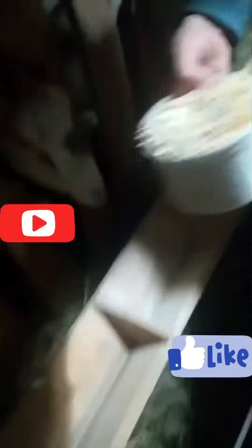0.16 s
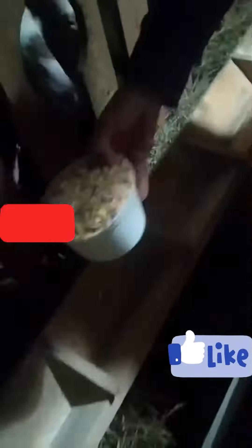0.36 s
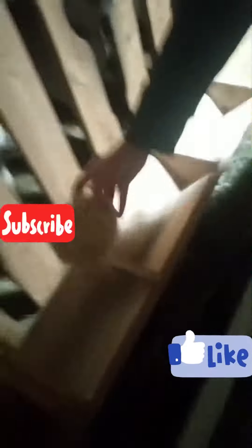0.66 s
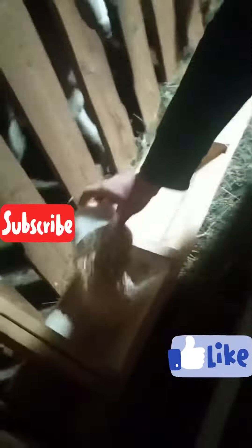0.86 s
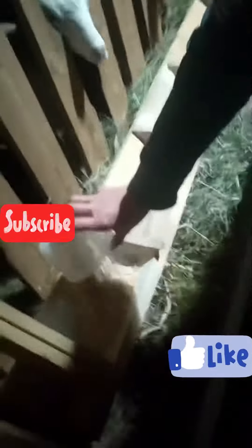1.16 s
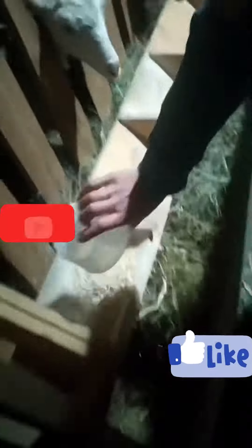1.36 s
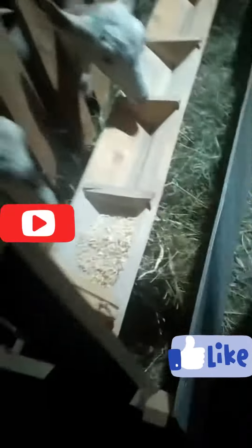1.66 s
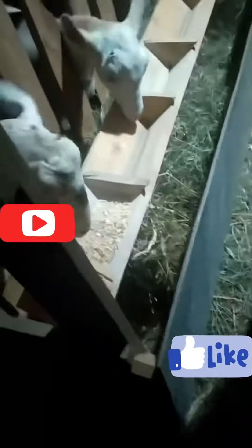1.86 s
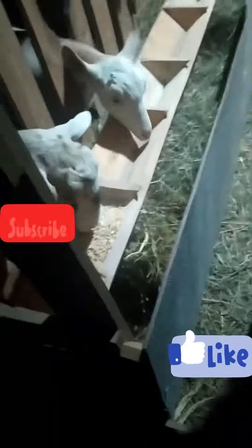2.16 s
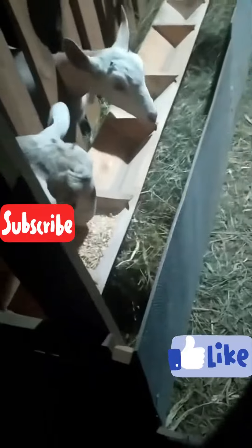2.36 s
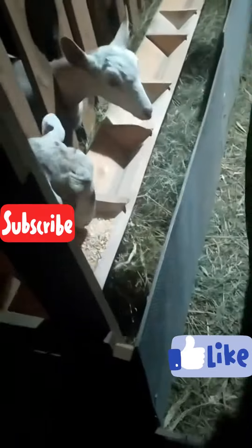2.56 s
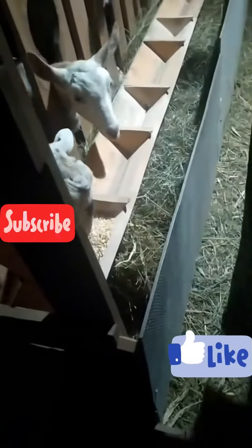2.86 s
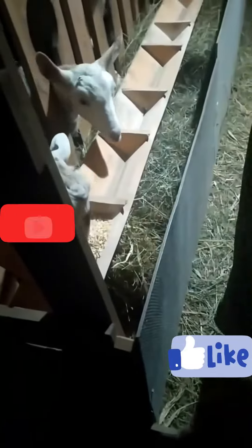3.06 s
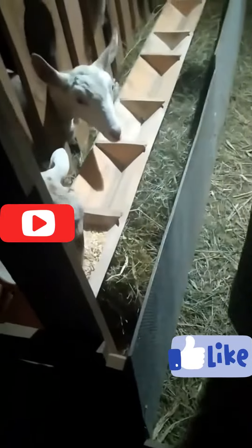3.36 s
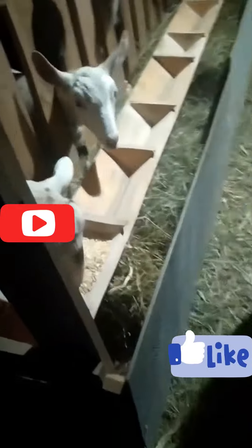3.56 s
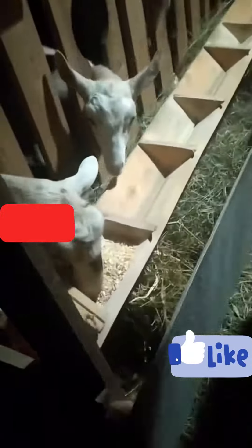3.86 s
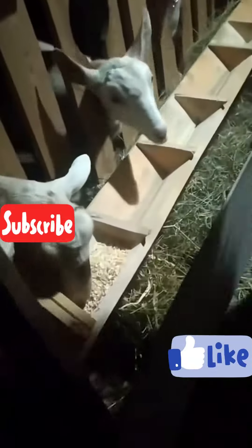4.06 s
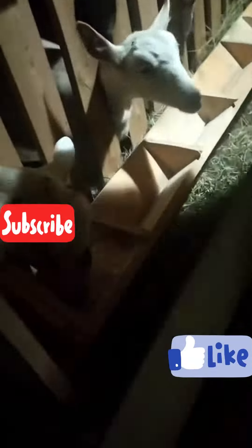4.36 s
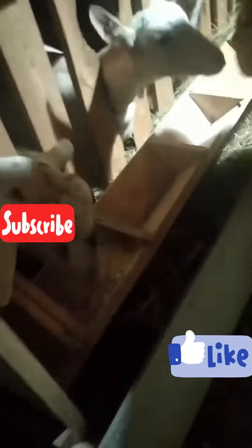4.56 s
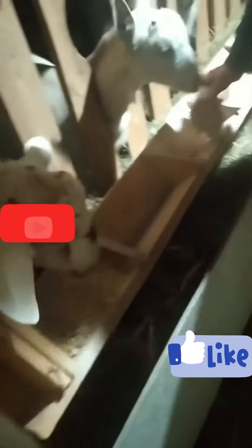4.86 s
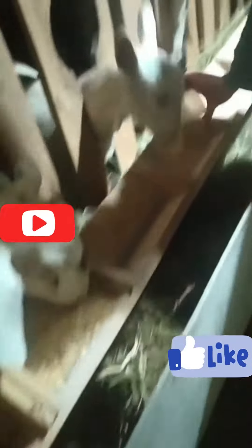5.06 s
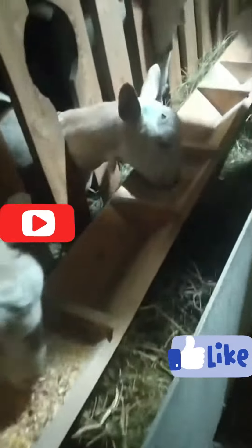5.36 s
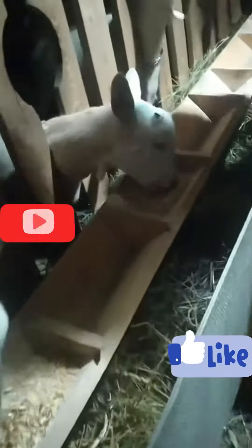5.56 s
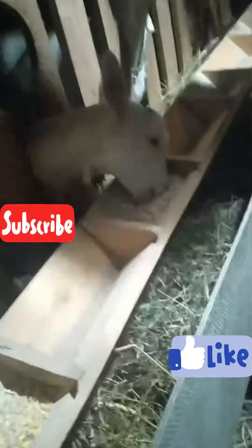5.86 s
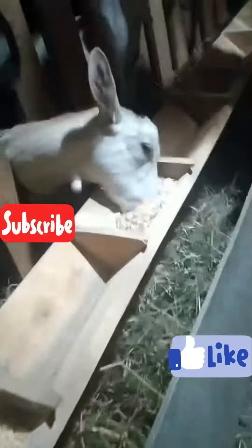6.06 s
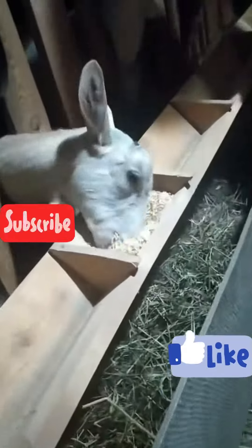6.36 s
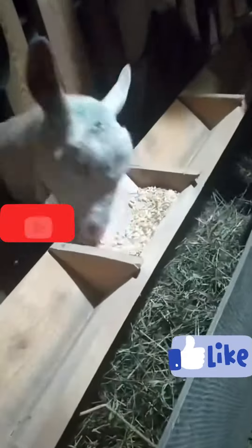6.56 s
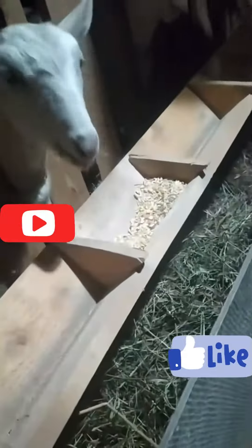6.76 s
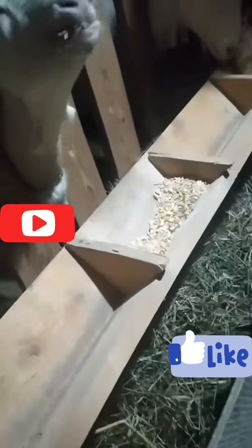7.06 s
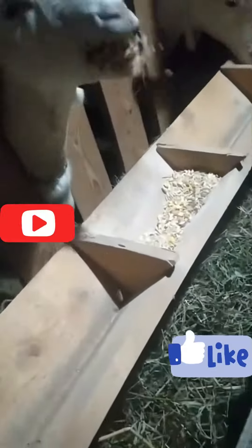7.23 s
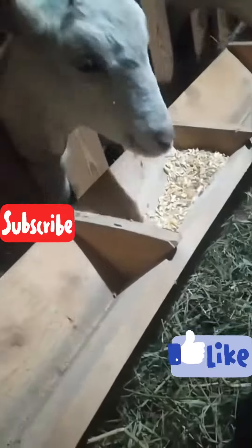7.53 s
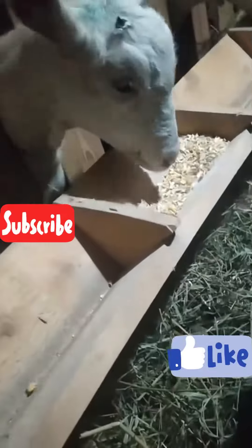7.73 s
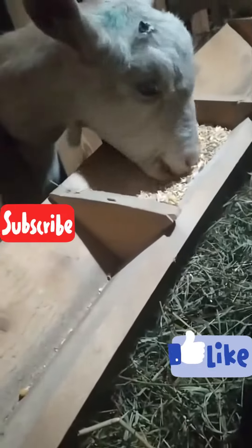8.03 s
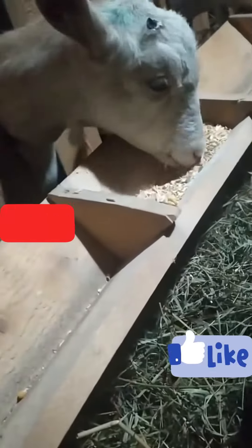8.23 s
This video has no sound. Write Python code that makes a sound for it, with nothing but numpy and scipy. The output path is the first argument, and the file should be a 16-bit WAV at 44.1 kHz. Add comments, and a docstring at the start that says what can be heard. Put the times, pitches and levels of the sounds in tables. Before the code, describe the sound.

Close microphone in a small wooden goat shed. A full plastic scoop bumps dully on boards, grain pours with a dry hissing rattle, and the empty scoop gives a loud hollow tap. A goat knocks a slat sharply; after a quieter spell, muzzles push through the kernels in irregular crunchy rushes, with soft wooden thumps, scrapes, snaps and faint chewing ticks. Low rumble and slight hiss lie underneath.

```python
"""A wooden goat pen, heard close, for some eight seconds: grain stirs, then a plastic scoop bumps the boards.
At 0.7 s it pours grain (filtered noise and kernel impulses) into a plank trough, and is tapped empty at 1.5 s.
From about 2 s necks scrape along the wood and goats knock the slats (decaying modes under a noise crack);
pushes through the grain go on to the end, with thumps, snaps and, from 3.4 s, faint chewing ticks.
Throughout there is low rumble and faint hiss; three times a wavering sine drone comes and goes."""
import sys
import numpy as np
from scipy import signal
from scipy.fft import rfft, irfft, next_fast_len
from scipy.io import wavfile
from scipy.ndimage import uniform_filter1d, map_coordinates

SR = 44100
rng = np.random.default_rng(int(sys.argv[2]) if len(sys.argv) > 2 else 0)


def wrap_up_sound(samples):
    """Save the sound to the file named by the first command line argument, as 16-bit audio."""
    columns = np.atleast_2d(samples).T
    # keep every value between -1 and 1, then stretch to whole-number steps
    tamed = np.clip(columns, -1, 1)
    steps = np.round(tamed * 32767).astype(np.int16)
    wavfile.write(sys.argv[1], SR, steps)


N = 369999  # length in samples
TOP_HZ = 8050  # upper limit of the bursts and of the microphone channel


def amp(db):
    """Decibels to gain."""
    return 10 ** (np.asarray(db) / 20)


def unit(x):
    """Scaled to rms 1."""
    return x / np.sqrt(np.mean(x ** 2) + 1e-20)


def along(points, hz):
    """(f/Hz, value) points read on a log frequency axis."""
    point_hz, value = np.transpose(points)
    return np.interp(np.log(hz + 1), np.log(point_hz + 1), value)


def wobble(rate):
    """A smooth random curve, rate knots a second."""
    knots = rng.standard_normal(int(N * rate / SR) + 4)
    return map_coordinates(knots, [np.arange(N) * rate / SR])


def filtered(x, response):
    """x times a response of frequency."""
    size = next_fast_len(len(x) + 8192)
    spectrum = rfft(x, size) * response(np.fft.rfftfreq(size, 1 / SR))
    return irfft(spectrum, size)[:len(x)]


def coloured(x, spectrum):
    """x shaped by the given spectrum, at rms 1."""
    return unit(filtered(x, lambda hz: amp(along(spectrum, hz))))


def fade(t, t60):
    """Exponential decay by 60 dB in t60."""
    return np.exp(-np.log(1000) * t / t60)


def swell(s, length, rise, t60):
    """Rises from time s, holds until its length is over, then dies away."""
    t = np.arange(N) / SR - s
    return np.clip(t / rise, 0, 1) * fade(np.maximum(t - length, 0), t60)


def add(track, s, sound):
    """Mix a sound into the track at time s."""
    part = track[round(s * SR):]
    part[:len(sound)] += sound[:len(part)]


def resonance(hz, centre, width):
    """Response of one damped mode."""
    return 1j * hz * width / (centre * centre - hz * hz + 1j * hz * width)


def burst(centre_hz, t60, octaves, attack):
    """A struck body with crowded modes around one pitch, dying away together."""
    t = np.arange(SR // 3) / SR

    def band(hz):
        distance = np.log2((hz + 1) / centre_hz) / octaves
        return (hz < TOP_HZ) / (1 + distance ** 2) ** 2

    envelope = fade(t, t60) * (1 - np.exp(-t / attack))
    body = unit(filtered(rng.standard_normal(len(t)), band) * envelope)
    return body * np.sqrt(np.mean(envelope ** 2))


def kernels(per_second, spread_db, smooth):
    """Countless tiny contacts of uneven size over a smooth sliding noise."""
    hit = rng.random(N) < per_second / SR
    size = amp(spread_db * np.clip(rng.standard_normal(N), -2, 2))
    contacts = unit(hit * size * rng.choice([-1, 1], N))
    return contacts + smooth * rng.standard_normal(N)


def mottled(x, depth_db):
    """Reflections between the boards raise and cancel narrow bands, which shift as the heads move."""
    bands = signal.stft(x, nperseg=1024)[2]
    field = uniform_filter1d(rng.standard_normal(bands.shape), size=3, axis=0)  # over frequency
    field = uniform_filter1d(field, size=12, axis=1)  # over time
    return signal.istft(bands * amp(depth_db * unit(field)), nperseg=1024)[1][:N]


# modes of the trough's planks: f/Hz, width/Hz, level/dB
PLANK_MODES = [(270, 98, -5.5), (475, 133, 1.5), (520, 265, -0.5), (821, 134, -3.5), (1050, 380, -12.5)]


def planks(hz):
    """Response of the trough's boards: damped modes of alternating sign."""
    response = 0
    for k, (centre, width, db) in enumerate(PLANK_MODES):
        response = response + (-1) ** k * amp(db) * resonance(hz, centre, width)
    return response


def grain_power(rows, rise, t60):
    """Power of hiss, crunch and boards: one movement drives all three."""
    return sum(np.outer(amp(levels_db), swell(s, length, rise, t60)) ** 2 for s, length, *levels_db in rows)


# the scoop is tipped out: t/s, length/s, hiss level/dB, crunch level/dB, trough boards level/dB
SCOOP_POUR = [(0.725, 0.22, -45, -48, -50.5)]
POUR_RISE_S, POUR_T60_S = 0.033, 1.62  # the stream builds up, then thins to a trickle
# pushes through the grain: t/s, length/s, hiss level/dB, crunch level/dB, trough boards level/dB
GRAIN_PUSHES = [(0.0, 0.15, -61, -75, -62.5), (0.33, 0.2, -57, -56, -61), (0.48, .03, -51.5, -55, -76),
                (0.64, .1, -60, -59, -67), (1.13, 0.17, -71, -61, -56), (1.48, 0.19, -60, -57, -57),
                (2.05, 0.29, -60, -68, -61), (2.345, 0.02, -57.5, -52, -59), (3.355, 0.12, -45.5, -45, -42),
                (3.6, 0.15, -52.5, -55, -54), (3.89, .09, -50, -49, -45.5), (4.03, 0.12, -49, -47, -54.5),
                (4.23, 0.36, -56.5, -59, -62), (4.825, .15, -50.5, -50, -45.5),
                (5.02, 0.087, -56, -56.5, -60), (5.25, 0.15, -62, -59, -51),
                (5.675, .12, -43.5, -46, -45.5), (5.92, 0.043, -48, -47, -49),
                (6.09, 0.34, -53.5, -52, -53), (6.38, 0.22, -54.5, -56.5, -52.5),
                (6.62, 0.071, -53.5, -58.5, -70), (6.775, .06, -51.5, -55.5, -70),
                (6.885, 0.041, -42.5, -43, -57), (7.0, 0.38, -56.5, -60, -58.5),
                (7.42, 0.18, -56, -53.5, -55.5), (7.675, 0.15, -43, -49.5, -46.5),
                (7.85, 0.073, -49.5, -47, -40), (8.09, 0.082, -50, -45, -48), (8.28, .11, -52.5, -49, -44)]
PUSH_RISE_S, SETTLE_T60_S = 0.035, 0.55  # the heap starts to slide; it comes to rest
# grain between the pushes: hiss level/dB, crunch level/dB, boards level/dB
RESTING_GRAIN = (-65, -65.5, -68)
SLIP_DB, SLIPS_PER_S = 1, 60  # the heap gives way in small slips
# spectrum of kernels rubbing: f/Hz, relative level/dB
RUBBING_SPECTRUM = [(1500, -26), (3300, -3), (4300, 7), (6000, 8.5), (7600, 9.5), (9000, -25.5)]
# spectrum of kernels being crushed: f/Hz, relative level/dB
CRUSHING_SPECTRUM = [(400, -40), (900, -2.5), (1400, -2.5), (2400, -0.5), (3400, -2), (4600, -8),
                     (8000, -49.5)]


def grain():
    """Kernels rub each other (hiss), are crushed together (crunch) and drum on the boards."""
    power = amp(RESTING_GRAIN)[:, None] ** 2
    power = power + grain_power(SCOOP_POUR, POUR_RISE_S, POUR_T60_S)
    power = power + grain_power(GRAIN_PUSHES, PUSH_RISE_S, SETTLE_T60_S)
    rubbing = mottled(kernels(per_second=1100, spread_db=-2, smooth=0.84), depth_db=3.0)
    crushing = mottled(kernels(per_second=600, spread_db=-2.5, smooth=1.0), depth_db=3.0)
    drumming = mottled(kernels(per_second=160, spread_db=4.0, smooth=0.99), depth_db=4.5)
    hiss = coloured(rubbing, RUBBING_SPECTRUM)
    crunch = coloured(crushing, CRUSHING_SPECTRUM)
    boards = unit(filtered(drumming, planks))
    mix = np.sum(np.sqrt(power) * [hiss, crunch, boards], axis=0)
    return mix * amp(SLIP_DB * wobble(SLIPS_PER_S))


# spectrum of the crack at a hard blow: f/Hz, relative level/dB
CRACK_SPECTRUM = [(150, 7.5), (600, 11.5), (1200, 7.5), (2000, 2), (3500, -2), (5200, -6.5), (6200, -5.5),
                  (8000, -16)]


def knocks(blows, modes, crack_t60):
    """Each blow rings the object's modes under a short crack; a longer contact softens the onset."""
    track, t = np.zeros(N), np.arange(SR // 2) / SR
    hz, level_db, t60 = np.transpose(modes)[:, :, None]
    strength = amp(level_db) * (-1) ** np.arange(len(hz))[:, None]
    ring = np.sum(strength * fade(t, t60) * np.sin(2 * np.pi * hz * t), axis=0)
    for s, ring_db, crack_db, contact in blows:
        crack = coloured(rng.standard_normal(len(t)), CRACK_SPECTRUM) * fade(t, crack_t60)
        onset = 1 - np.exp(-t / contact)
        add(track, s, (amp(ring_db) * ring + amp(crack_db) * crack) * onset)
    return track


# full scoop on the boards, then empty scoop on the trough: t/s, ring level/dB, crack level/dB, contact/s
FULL_SCOOP_BUMPS = [(0.2835, -43, -32.5, 0.00094), (0.2885, -18, -37.5, 0.001), (0.3125, -23, -44, 0.0016)]
EMPTY_SCOOP_TAPS = [(1.535, -6, -25.5, 0.0009), (1.5412, -24.5, -29, 0.00023)]
# modes of the plastic scoop, full and empty: f/Hz, level/dB, t60/s
FULL_SCOOP_MODES = [(308, -3, 0.093), (364.6, 4.5, 0.073), (513, -29, 0.06), (720, -8.5, 0.074),
                    (1140, -17, 0.07)]
EMPTY_SCOOP_MODES = [(256, -20, 0.051), (431, -8, 0.091), (943, -3, 0.054), (1146, -11, 0.034),
                     (1717, -18, 0.038), (2534, -19, 0.037), (3070, -19.5, 0.041), (3660, -14, 0.033),
                     (4560, -21, .05), (5110, -8.5, 0.015)]


def scoop():
    """The full scoop bumps dully; emptied, it rings higher when tapped on the trough."""
    bump = knocks(FULL_SCOOP_BUMPS, FULL_SCOOP_MODES, crack_t60=0.23)
    tap = knocks(EMPTY_SCOOP_TAPS, EMPTY_SCOOP_MODES, crack_t60=0.11)
    return bump + tap


# goats against the slats of the pen: t/s, ring level/dB, crack level/dB, contact/s
SLAT_KNOCKS = [(2.2148, -9, -28, 0.00087), (2.27, -35.5, -37, 0.0014), (2.648, -49, -77, 0.0051)]
# modes of a slat: f/Hz, level/dB, t60/s
SLAT_MODES = [(204, -10.5, 0.032), (340, -1.5, 0.081), (414, -5, 0.005), (688, 0.5, 0.041),
              (1006, -2.5, .035), (1104, -8.5, 0.09), (1143, -1.5, 0.034), (1260, 0, 0.018),
              (1360, -16, 0.055), (1493, -13, 0.039), (2550, -29, 0.051), (3570, -26, 0.047)]


def slats():
    """A knocked slat rings in many short wooden modes."""
    return knocks(SLAT_KNOCKS, SLAT_MODES, crack_t60=0.14)


# muzzles, hooves and hands on the boards: t/s, level/dB, f/Hz, t60/s
BOARD_BUMPS = [(0.758, -37, 336, 0.055), (0.766, -32, 134.3, 0.35), (1.222, -34.5, 216, 0.052),
               (1.251, -35, 498, 0.073), (1.796, -46, 337, 0.11), (2.1, -31.5, 612, 0.15),
               (2.12, -38.5, 434, .15), (2.528, -30.5, 756, 0.031), (2.648, -51, 488, .08),
               (2.783, -44.5, 888, 0.065), (3.215, -47.5, 867, 0.063), (3.911, -36.5, 786, 0.059),
               (4.06, -39, 480, .05), (4.713, -37.5, 214.5, 0.3), (4.716, -25.5, 815, 0.045),
               (4.727, -32.5, 515, 0.2), (5.453, -46, 835, .07), (5.561, -47, 384, 0.17),
               (5.659, -33, 563, 0.039), (5.701, -36, 563, 0.064), (6.016, -40, 413, .06),
               (6.346, -40, 544, 0.088), (6.4, -32, 471, 0.1), (6.471, -28.5, 561, 0.1),
               (6.488, -20.5, 334, 0.078), (6.518, -31.5, 201, 0.28), (7.336, -42, 710, 0.042),
               (7.438, -23.5, 135, 0.061), (7.66, -37, 357, 0.12), (7.714, -35, 257, .095),
               (7.82, -26, 518, 0.034), (7.845, -29, 474, .025), (8.246, -31, 418, 0.061)]


def bumps():
    """Soft blows on wood: one mode sings out of a thud."""
    track, t = np.zeros(N), np.arange(SR // 3) / SR
    for s, db, hz, t60 in BOARD_BUMPS:
        mode = np.sin(2 * np.pi * hz * t) * fade(t, t60) * (1 - np.exp(-t * hz * 2))
        thud = burst(hz, t60, octaves=1.16, attack=0.49 / hz)
        add(track, s, amp(db) * (mode + 0.71 * thud))
    return track


# leaning on the trough: t/s, length/s, rumble level/dB
TROUGH_SHOVES = [(0.747, 0.079, -46.5), (3.38, 0.14, -56), (4.033, .1, -48), (5.704, 0.09, -51.5),
                 (6.37, 0.048, -43), (6.495, 0.1, -44), (7.443, 0.096, -44), (7.692, 0.075, -37.5),
                 (7.97, 0.1, -43), (8.086, 0.077, -36.5), (8.27, 0.052, -42.5)]
SHOVE_RISE_S, SHOVE_T60_S = 0.02, 0.26


def leaning():
    """A goat leaning in keeps the trough rumbling: low noise follows the weight."""
    power = np.zeros(N)
    for s, length, db in TROUGH_SHOVES:
        power += (amp(db) * swell(s, length, SHOVE_RISE_S, SHOVE_T60_S)) ** 2
    # f/Hz, relative level/dB
    spectrum = [(30, -29.5), (50, -4.5), (110, 1.5), (240, -4.5), (450, -23.5), (1200, -52.0)]
    return np.sqrt(power) * coloured(rng.standard_normal(N), spectrum)


# necks and muzzles along wood: t/s, length/s, peak level/dB, wood f/Hz, rasp level against the wood/dB
WOOD_RUBS = [(1.889, 0.058, -52, 500, -6.5), (2.92, 0.24, -55, 458, -21), (3.387, 0.52, -53, 259, -6),
             (3.893, 0.54, -57.5, 457, -6), (4.844, 0.17, -47.5, 515, -14), (5.722, 0.12, -40.5, 590, -4),
             (6.38, 0.22, -37.5, 490, -6), (6.884, 0.16, -45.5, 784, -2), (7.742, 0.2, -42.5, 500, -1.5),
             (8.1, 0.33, -60, 690, 0)]
# spectrum of the rasp: f/Hz, relative level/dB
RASP_SPECTRUM = [(1000, -20), (1500, -11.5), (1900, -6.5), (2350, -3), (2750, -7), (3200, -7.5),
                 (3900, -16), (8000, -29)]


def rubs():
    """Each scrape swells fast and dies away; its tiny slips sing in the wood and rasp above it."""
    track = np.zeros(N)
    slips = mottled(kernels(per_second=450, spread_db=1.0, smooth=0.63), depth_db=6.0)
    for s, length, db, wood_hz, rasp_db in WOOD_RUBS:
        stroke = slips[round(s * SR):][:round(length * SR)]
        wood = unit(filtered(stroke, lambda hz: resonance(hz, wood_hz, 0.39 * wood_hz) ** 2))
        rasp = amp(rasp_db) * coloured(stroke, RASP_SPECTRUM)
        pressure = np.sin(np.pi * np.linspace(0, 1, len(stroke)) ** 0.56)
        add(track, s, amp(db) * pressure * (wood + rasp))
    return track


# kernels and straws snapping: t/s, level/dB, centre f/Hz, t60/s (the ping takes half of it)
KERNEL_SNAPS = [(0.003, -38.5, 1550, 0.061), (0.492, -41, 1620, 0.16), (0.511, -41.5, 6000, 0.074),
                (0.643, -45.5, 5370, 0.085), (1.053, -42.5, 1500, 0.14), (1.503, -40.5, 4880, 0.085),
                (1.5896, -37.5, 2160, 0.14), (1.9622, -35, 7560, 0.014), (2.0176, -44, 2570, 0.03),
                (2.099, -50, 1500, 0.053), (2.3784, -41.5, 5000, .04), (2.5272, -38.5, 5060, 0.083),
                (2.7813, -42.5, 5600, 0.076), (3.045, -49, 1940, 0.086), (3.374, -32, 5200, 0.16),
                (3.379, -31, 1340, 0.081), (3.483, -36.5, 2850, 0.15), (4.111, -37, 4500, 0.045),
                (4.5772, -39.5, 2630, 0.023), (4.66, -38, 2080, 0.053), (4.7091, -38, 1770, 0.12),
                (5.257, -38, 2650, 0.016), (5.309, -37, 2700, 0.029), (5.357, -40, 3120, 0.1),
                (5.659, -41, 1290, 0.045), (6.195, -40.5, 2240, 0.085), (6.459, -40.5, 2430, 0.088),
                (6.55, -35.5, 3450, 0.14), (6.842, -41, 1560, 0.043), (7.433, -41.5, 1300, 0.033),
                (7.55, -40, 4570, 0.14), (7.787, -35.5, 1450, .08), (8.019, -39, 1370, 0.033)]
SNAP_RISE_S = 0.0003
SNAP_OCTAVES, SNAP_PING = 1.57, 0.51  # width of the crack; gain of its ping


def snaps():
    """Kernels and straws crack with a brief ping."""
    track, t = np.zeros(N), np.arange(SR // 3) / SR
    for s, db, hz, t60 in KERNEL_SNAPS:
        crack = burst(hz, t60, octaves=SNAP_OCTAVES, attack=SNAP_RISE_S)
        ping = np.sin(2 * np.pi * hz * t) * fade(t, t60 / 2)
        add(track, s, amp(db) * (crack + SNAP_PING * ping))
    return track


TICKS_FROM_S, TICK_DB, TICK_SPREAD_DB = 3.4, -50, 7  # beginning, weakest level, range above it


def chewing():
    """Once the goats feed, 32 faint ticks fall at random, centred between 1200 and 6000 Hz."""
    track = np.zeros(N)
    for when, size, pitch in rng.random((32, 3)):
        s = TICKS_FROM_S + when * (N / SR - TICKS_FROM_S)
        tick = burst(1200 * 5 ** pitch, 0.018, octaves=0.99, attack=0.00033)
        add(track, s, amp(TICK_DB + TICK_SPREAD_DB * size) * tick)
    return track


# a faint low drone comes and goes: t/s, length/s, first f/Hz, last f/Hz, rms level/dB
DRONE_SPELLS = [(0.0, 0.45, 157.8, 150.2, -60.5), (2.219, 1.35, 137.9, 154, -59.5),
                (4.95, 1.81, 92.36, 97.15, -55)]
DRONE_RISE_S, DRONE_T60_S = 0.054, 1


def drone():
    """A wavering sine that glides a little each time it comes."""
    track = np.zeros(N)
    for s, length, first_hz, last_hz, db in DRONE_SPELLS:
        glide = np.interp(np.arange(N) / SR, [s, s + length], [first_hz, last_hz])
        hz = glide + 0.76 * wobble(13)
        tone = unit(np.sin(2 * np.pi * np.cumsum(hz) / SR))
        track += amp(db) * swell(s, length, DRONE_RISE_S, DRONE_T60_S) * tone
    return track * amp(1.5 * wobble(6.4))


# spectrum of the background: f/Hz, relative level/dB
AIR_SPECTRUM = [(20, -54.5), (33, -27), (47, 1.5), (70, 1.5), (105, -5), (170, -10.5), (300, -14),
                (700, -20), (2000, -27.5), (8000, -35)]


def air():
    """Steady noise: low rumble and faint hiss."""
    return amp(-53.0) * coloured(rng.standard_normal(N), AIR_SPECTRUM)


# decay of the shed: f/Hz, t60/s
SHED_DECAY = [(100, 0.43), (1000, 0.24), (8000, 0.13)]


def shed(x):
    """The short answer of a wooden shed bedded with hay: noise that dies faster in the treble."""
    hz, t, bands = signal.stft(rng.standard_normal(SR // 2), SR, nperseg=256)
    decay = fade(t, along(SHED_DECAY, hz)[:, None])
    tail = signal.istft(bands * decay, SR, nperseg=256)[1]
    delayed = np.pad(x, (SR // 200, 0))  # 5 ms
    return signal.fftconvolve(delayed, tail / np.linalg.norm(tail))[:N]


def scene():
    """Blows, scrapes and ticks sound close in the shed, over the grain and the background."""
    contacts = scoop() + slats() + bumps() + leaning() + rubs() + snaps() + chewing()
    echo = amp(-19) * shed(contacts)
    return (contacts + echo + grain() + drone() + air())[None]


def record(dry):
    """The microphone channel rounds off the highest peaks and cuts the deepest bass and the top treble."""
    rounded = dry[0] / (1 + (dry[0] / 0.43) ** 6) ** (1 / 6)

    def channel(hz):
        treble_cut = 1 + (hz / TOP_HZ) ** 90
        bass_cut = 1 + (35 / (hz + 1)) ** 10
        return 1 / np.sqrt(treble_cut * bass_cut)

    return filtered(rounded, channel)[None]


dry = scene()
out = record(dry)
wrap_up_sound(out)
```